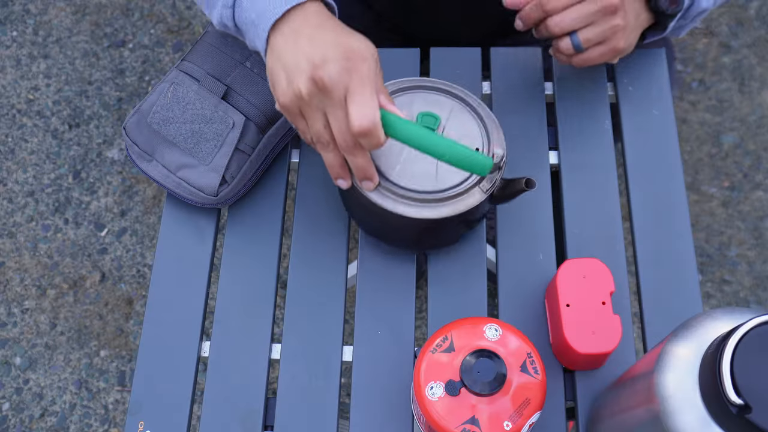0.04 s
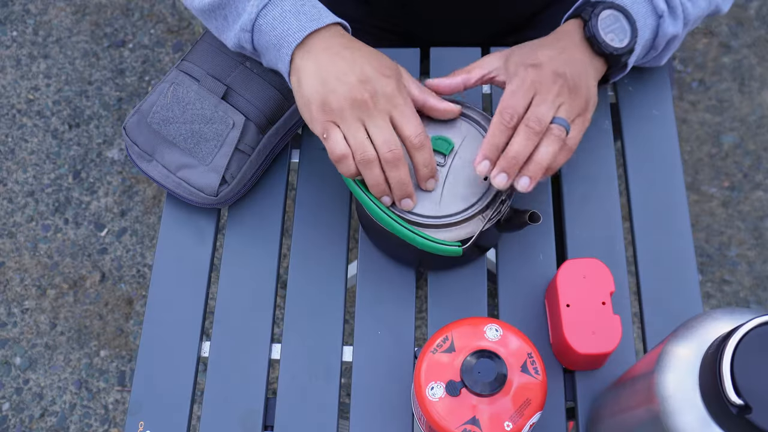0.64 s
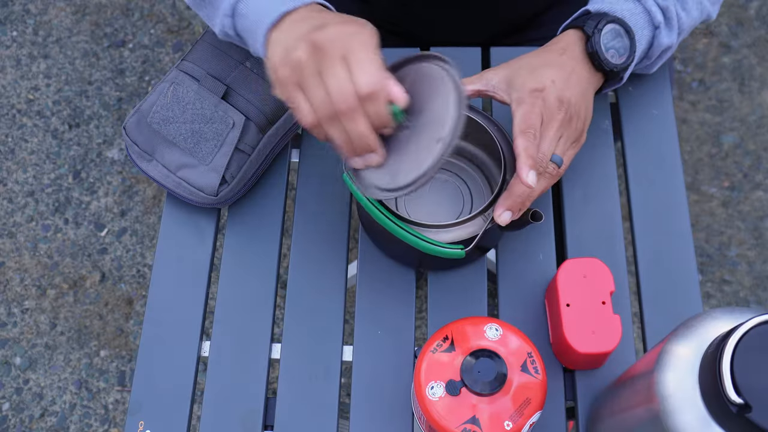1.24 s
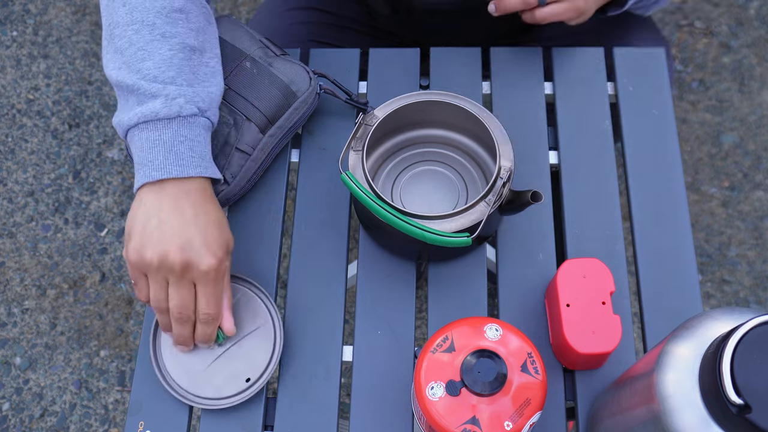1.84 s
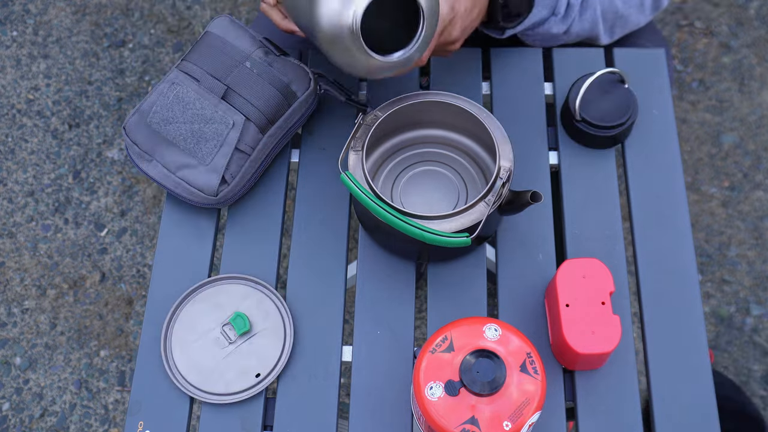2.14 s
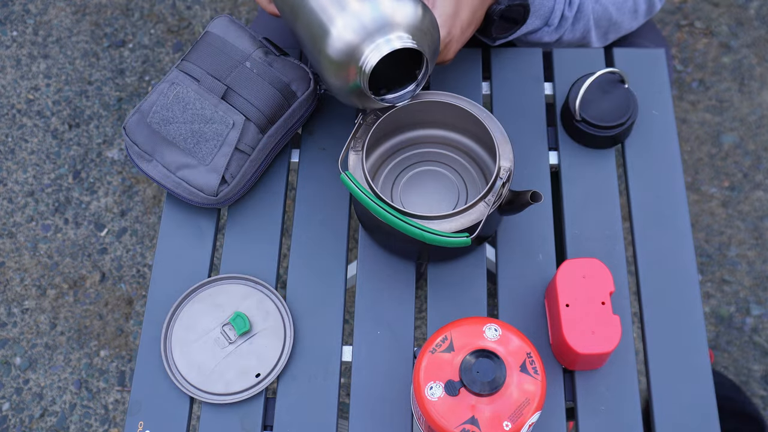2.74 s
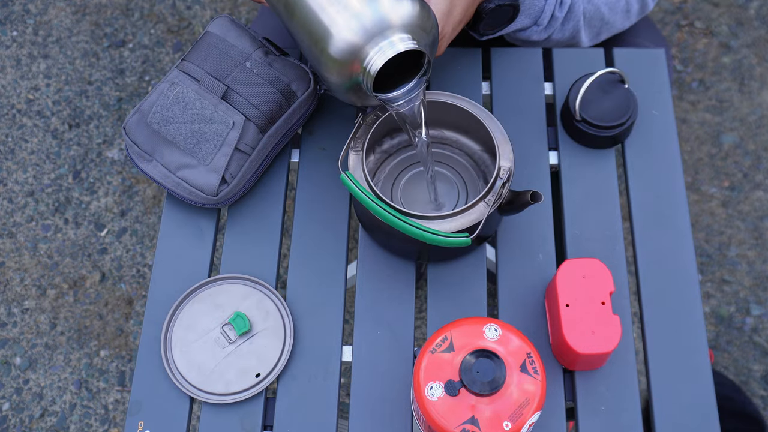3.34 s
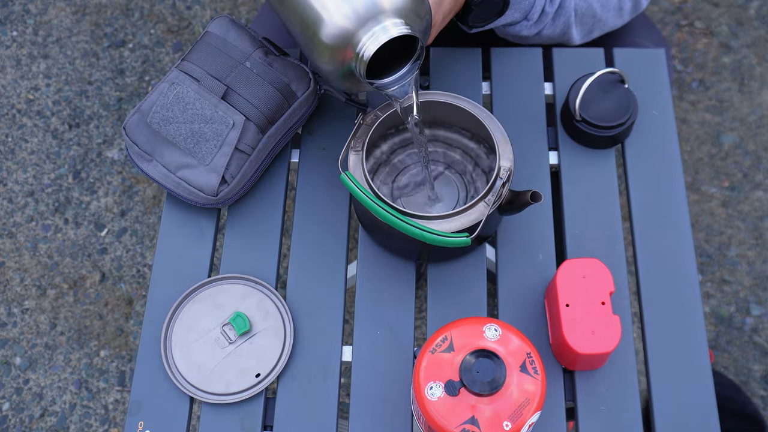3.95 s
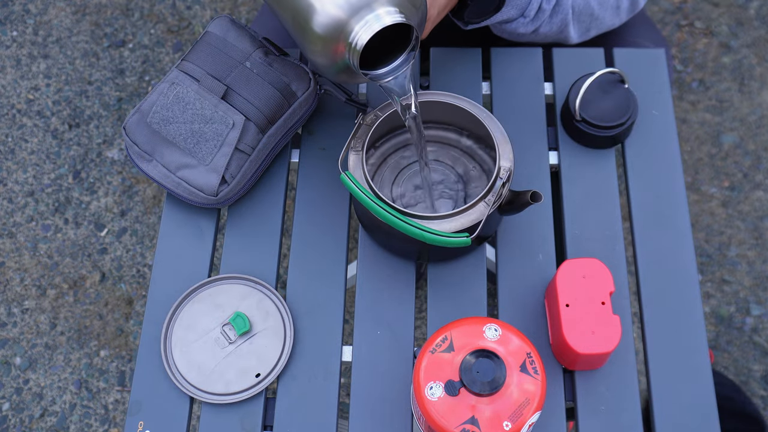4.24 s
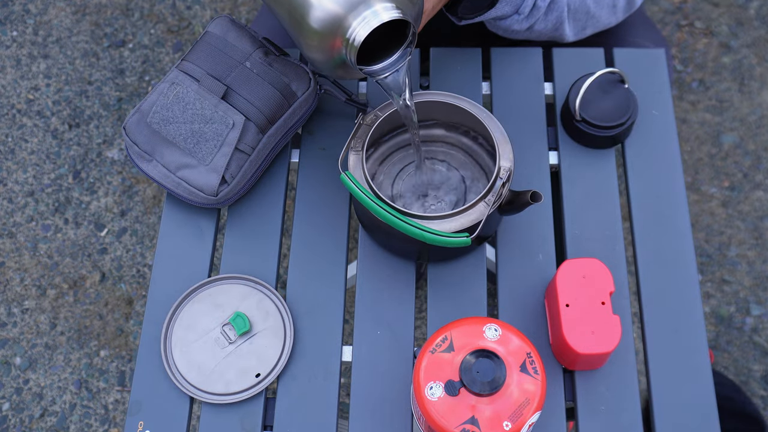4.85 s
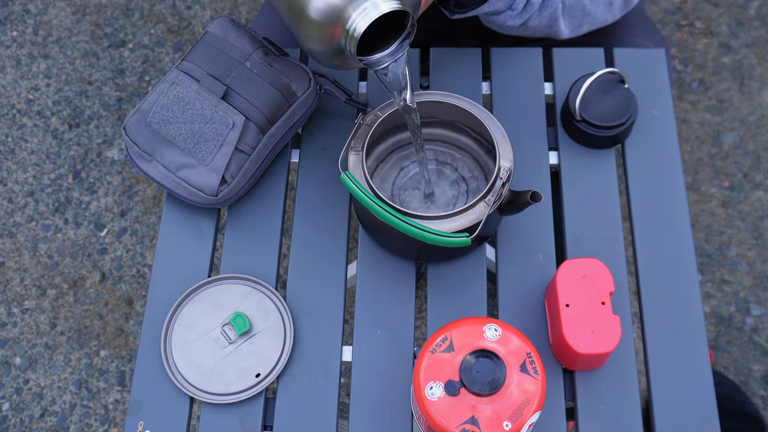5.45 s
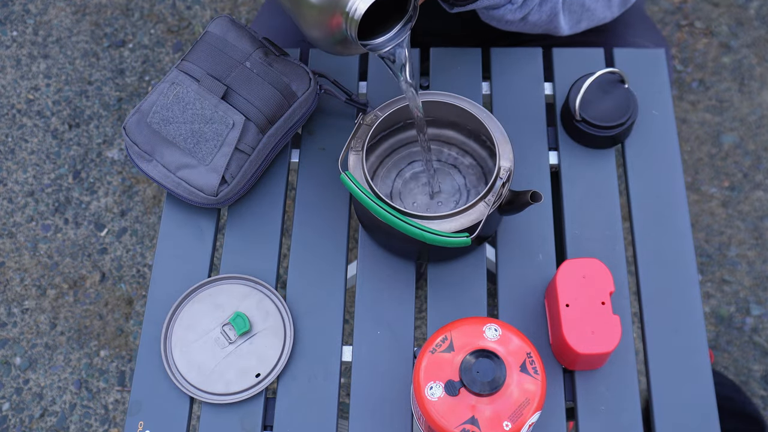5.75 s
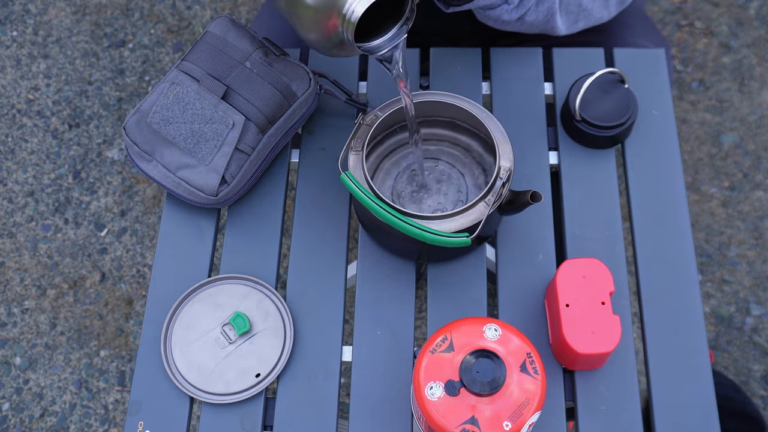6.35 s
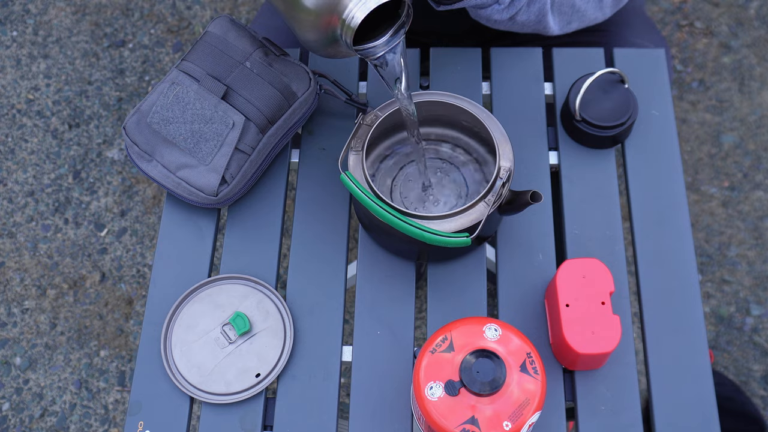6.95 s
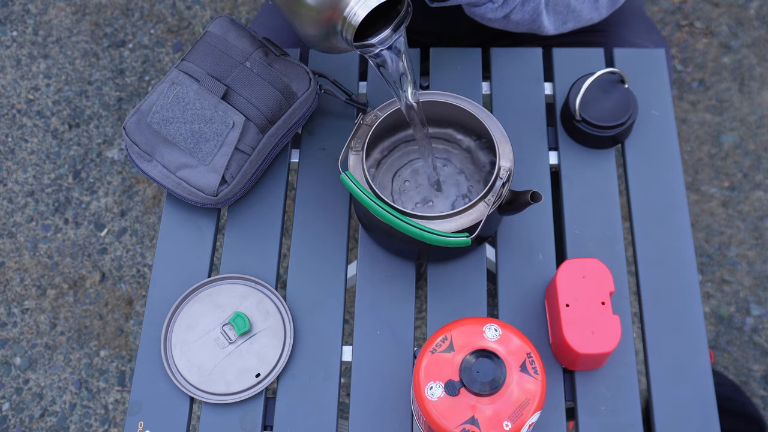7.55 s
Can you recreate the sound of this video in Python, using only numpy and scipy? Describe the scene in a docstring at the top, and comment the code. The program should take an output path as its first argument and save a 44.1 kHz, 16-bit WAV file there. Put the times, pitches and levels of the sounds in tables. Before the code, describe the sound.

Close by, a thin metal camp kettle clatters onto a table. Its handle is folded down with small knocks and rasps, and the lid clinks off and rattles down, ringing briefly. The clatter stops dead. Water drips from a steel bottle, then streams into the kettle, gurgling, fizzing and plinking. Far off in quiet open air, birds whistle long falling notes and later a see-saw song.

```python
"""A thin metal camp kettle clatters onto a slatted table, just below the microphone. Its handle is folded down
and its lid lifted off and laid aside, the metal ringing at each knock and rasping where it is rubbed. At 2.1 s
all the metal sounds break off at once; water from a steel bottle drips, then streams into the kettle, its
bubbles gurgling, fizzing and plinking while the bottom hums. Far off among trees, in quiet open air, birds
whistle long falling notes and a see-saw song."""
import sys
import numpy as np
from scipy import signal
from scipy.fft import rfft, irfft, next_fast_len
from scipy.io import wavfile
from scipy.ndimage import map_coordinates

SR = 44100
rng = np.random.default_rng(int(sys.argv[2]) if len(sys.argv) > 2 else 0)


def persist_wave(psi):
    """Save psi, clipped to +-1, as 16-bit WAV."""
    counts = np.round(np.clip(psi, -1, 1) * 32767).astype(np.int16)
    wavfile.write(sys.argv[1], SR, np.atleast_2d(counts).T)


N = 334719
TOP_HZ = 16000


# The kettle meeting the table, then its handle. Each row: start in seconds, thud, clank and crack in dB.
KETTLE_KNOCKS = [(0.1779, -14, -11.5, -26), (0.1894, -21, -15, -27), (0.213, -24, -14, -39),
                 (0.228, -23, -11.5, -28), (0.2417, -15.5, -19, -22.5), (0.2486, -15, -17.5, -17),
                 (0.462, -63, -33.5, -39.5), (0.572, -44, -24, -62), (0.631, -38, -33, -40),
                 (0.6446, -56, -25.5, -34.5), (0.654, -34, -32.5, -42.5), (0.881, -64, -35, -33),
                 (0.956, -33, -40, -41), (0.983, -31.5, -32.5, -32)]
# Tone of a knock on the empty kettle. Each row: frequency in Hz, relative level in dB.
KETTLE_SPECTRUM = [(80, -33.5), (160, -10.5), (270, -1.5), (430, -3.5), (560, -11), (1150, -2.5),
                   (1800, -6.5), (3200, -10.5), (4000, -16.5), (4600, -15), (6500, -19), (15000, -19.5)]
# The empty kettle's modes. Each row: frequency in Hz, relative level in dB, t60 in seconds.
KETTLE_RING = [(170, -5.5, 0.11), (243.6, -1.5, .17), (426, -2, 0.12), (589, -7, 0.087), (812, -0.5, 0.14),
               (966, 1.5, 0.2), (1145, 2.5, 0.16), (1213, -13, 0.37), (1298, -0.5, 0.22), (1402, 3, 0.094),
               (1964, -12, 0.34), (2000, -23.5, 0.71), (2353, -5.5, 0.21), (2638, -23.5, .7),
               (2720, -15.5, .2), (3210, -9, 0.21), (4500, -6.5, .12)]

def kettle():
    """Close up on the table: each knock clanks and leaves the thin wall ringing."""
    metal = knocks(KETTLE_KNOCKS, KETTLE_SPECTRUM, t60s=(0.064, 0.082, 0.084), gain_db=0)
    metal += ringing([(s, clank_db) for s, _, clank_db, _ in KETTLE_KNOCKS], KETTLE_RING, ring_db=-11.5)
    return metal + amp(-23) * shimmer(metal)


# The lid lifted and laid down. Each row: start in seconds, thud, clank, crack and free ring in dB.
LID_KNOCKS = [(1.081, -69.5, -24.5, -34.5, -52.5), (1.091, -38, -26.5, -19, -37.5),
              (1.138, -40, -27, -18, -55.5), (1.143, -50.5, -21, -18.5, -36.5),
              (1.158, -53, -33.5, -37, -37.5), (1.309, -76, -38, -44.5, -64), (1.976, -30.5, -12, -34, -26),
              (2.031, -37, -18, -52, -40.5), (2.045, -28, -23, -58, -36.5),
              (2.0852, -42.5, -11.5, -26.5, -27), (2.091, -27, -13.5, -45.5, -43),
              (2.101, -48, -18, -37.5, -23.5)]
# Tone of a knock on the lid. Each row: frequency in Hz, relative level in dB.
LID_SPECTRUM = [(120, -42.5), (400, -16.5), (520, -47.5), (750, 1.5), (1080, 9), (1700, 1), (2700, -1),
                (4600, -12.5), (5600, -18), (8500, -28.5), (10000, -35.5), (15500, -30.5)]
# The lid's modes. Each row: frequency in Hz, relative level in dB, t60 in seconds.
LID_RING = [(396, -16.5, 0.44), (1113, -3.5, 0.22), (1297, -4.5, 0.26), (1664, -7, 0.31), (1954, 1, 0.19),
            (2073, 5.5, 0.2), (3060, -6, 0.22), (3530, -10, 0.33), (4360, -2, 0.052), (5740, -13, 0.089),
            (6820, -16, 0.096), (7550, -20, 0.073), (8010, -23, 0.11), (8450, -23.5, 0.14)]

def lid():
    """The lid clinks off the kettle and rattles down beside it, ringing in its own modes."""
    clatter = knocks(LID_KNOCKS, LID_SPECTRUM, t60s=(0.15, 0.056, 0.098), gain_db=-2)
    return clatter + ringing([(s, free_db) for s, *_, free_db in LID_KNOCKS], LID_RING, ring_db=0.5)


def knocks(hits, spectrum, t60s, gain_db):
    """Each contact excites a crowd of short-lived modes; t60s are for thud, clank and crack, in seconds."""
    out, t = np.zeros(N), np.arange(SR // 4) / SR
    bands_hz = [(100, 550), (550, 4000), (4000, TOP_HZ)]
    for s, *levels_db in hits:
        crowd = coloured(rng.standard_normal(len(t)), spectrum)
        knock = sum(unit(band(crowd, lo, hi)) * amp(db - 60 * t / t60)
                    for (lo, hi), db, t60 in zip(bands_hz, levels_db, t60s))
        add(out, s, amp(gain_db) * knock * onset(t, .0003))
    return out


def ringing(blows, modes, ring_db):
    """A few modes ring on after each (seconds, dB) blow, at new strengths every time."""
    out, t = np.zeros(N), np.arange(SR * 3 // 4) / SR
    for s, blow_db in blows:
        ring = 0
        for hz, db, t60 in modes:
            decay = amp(db + rng.normal(0, 1) - 60 * t / t60)
            ring += decay * np.sin(2 * np.pi * (hz * t + rng.random()))
        add(out, s, amp(blow_db + ring_db) * ring * onset(t, 0.00061))
    return out


def shimmer(x, t60=0.57):
    """Many faint partials of the thin wall ring on after a blow."""
    t = np.arange(SR * 3 // 4) / SR
    return convolved(x, band(rng.standard_normal(len(t)), 1500, 9000) * amp(-60 * t / t60))


# Strokes over the metal. Each row: start and length in seconds, final rub, final hiss and swell in dB.
RUB_STROKES = [(.25, 0.11, -53.5, -67, -11), (0.478, 0.097, -26.5, -48, 17), (0.606, 0.028, -29, -49, 27),
               (0.793, 0.12, -47, -48.5, 4.5), (0.963, 0.074, -45, -60, -10),
               (1.075, 0.072, -34.5, -32.5, 7), (1.281, 0.016, -46.5, -49, 2), (1.351, 0.11, -28, -61, 13),
               (1.59, 0.084, -57.5, -82, 7)]
# Tone of the rubbing. Each row: frequency in Hz, relative level in dB.
RUB_SPECTRUM = [(100, -29.5), (280, -11.5), (420, -12), (720, 1.5), (1250, 5), (2000, -7.5), (3500, -6.5),
                (6000, -17), (15000, -27)]
# Resonances of the rubbed metal. Each row: centre and width in Hz, strength in dB.
SHELL_PEAKS = [(440, 42, 18.5), (570, 130, 11.5), (627, 130, 4.5), (1108, 50, 0.5), (1320, 38, 6),
               (1510, 240, 9.5), (2260, 70, 15), (2700, 71, -5.5), (3320, 81, -8), (4880, 130, 7)]

def rubbing(slips_per_s=700, grit_db=-1):
    """Tiny slips of handle, fingers and lid excite the thin metal."""
    rub_gain, hiss_gain = sum(np.outer(amp([rub_db, hiss_db]), stroke(s, length, swell_db))
                              for s, length, rub_db, hiss_db, swell_db in RUB_STROKES)
    slips = unit((rng.random(N) < slips_per_s / SR) * rng.standard_normal(N))
    force = rng.standard_normal(N) + amp(grit_db) * slips
    scrape = resonant(coloured(in_kettle(force, echo_db=3.5), RUB_SPECTRUM), SHELL_PEAKS)
    hiss = band(in_kettle(force, echo_db=-6.5), 3900, 13000)
    return rub_gain * unit(scrape) + hiss_gain * unit(hiss)


def stroke(s, length, swell_db, attack_s=0.0075, release_db_per_s=333):
    """A stroke takes hold, swells or eases to its final strength and lets go."""
    t = np.arange(N) / SR - s
    db = swell_db * (np.clip(t / length, 0, 1) - 1) - release_db_per_s * np.maximum(t - length, 0)
    return np.clip(t / attack_s, 0, 1) * amp(db)


# Dull taps on the metal. Each row: start in seconds, level in dB, pitch in Hz, t60 in seconds.
SOFT_TAPS = [(.288, -26, 273, 0.085), (.463, -29.5, 828, 0.093), (.881, -20, 660, 0.047),
             (.957, -17.5, 626, 0.031), (0.986, -17, 1410, 0.029), (1.075, -26, 673, 0.045),
             (1.235, -39, 400, 0.11), (1.351, -37, 396, 0.4), (2.28, -58, 388, 0.88),
             (2.69, -51, 382, 0.12), (2.971, -30.5, 396, 0.11), (2.974, -19.5, 590, 0.021)]

def taps():
    """Each soft contact of hands or bottle wakes a single low mode."""
    out, t = np.zeros(N), np.arange(SR // 4) / SR
    for s, db, hz, t60 in SOFT_TAPS:
        add(out, s, amp(db - 60 * t / t60) * np.sin(2 * np.pi * hz * t) * onset(t, 0.0012))
    return out


# The pour, heard from above the kettle. Each row: time in seconds, gurgle and fizz in dB.
POUR_LEVELS = [(3.45, -63, -49), (3.55, -60.8, -54), (3.76, -45, -45), (3.9, -62.5, -58.5),
               (4.03, -56.5, -56), (4.16, -61, -53.5), (4.3, -50.5, -52.5), (4.42, -46, -44),
               (4.62, -43.5, -41), (5.0, -46, -47.6), (5.08, -55, -48), (5.19, -54.5, -57),
               (5.3, -48, -49.5), (5.63, -45.5, -48), (5.7, -61, -71), (5.83, -59.3, -66), (5.91, -39, -44),
               (6.2, -42.5, -41.5), (6.45, -41.5, -44.5), (6.62, -49, -49), (6.72, -42.5, -53.5),
               (6.88, -49, -53.5), (7.15, -55, -63), (7.24, -46, -57.5), (7.59, -48.5, -50)]

def stream(surges_per_s=15, surge_db=1.27):
    """Water wavers as it leaves the bottle and drives large and tiny bubbles into the kettle."""
    gurgle_db, fizz_db = curves(POUR_LEVELS) + surge_db * wobble(surges_per_s)
    blobs = spurts(per_s=160, spread_db=2.5, t60=.07)
    flowing = np.clip((np.arange(N) / SR - POUR_LEVELS[0][0]) / .1, 0, 1)
    return flowing * (amp(gurgle_db) * gurgle(blobs) + amp(fizz_db) * fizz(blobs))


# Tone of the large bubbles. Each row: frequency in Hz, relative level in dB.
GURGLE_SPECTRUM = [(400, -3), (900, -15.5), (1500, -4.5), (2500, 4.5), (3800, 9.5), (5200, 7.5),
                   (7000, 13.5)]
# Resonances of the open kettle. Each row: centre and width in Hz, strength in dB.
HOLLOW_PEAKS = [(919, 36, 12.5), (1147, 52, 6.5), (1410, 140, 2), (1660, 160, -5.5), (2330, 79, 3.5),
                (3280, 540, -2), (3940, 47, 2.5), (5110, 320, 3.5)]

def gurgle(blobs, wash_db=-15):
    """Large bubbles and a soft wash of noise resound in the kettle's hollow."""
    swarm = bubbles(blobs, count=6500, lo_hz=900, hi_hz=5600, cycles=28, spread_db=4.6)
    water = unit(in_kettle(swarm, echo_db=0))
    water += amp(wash_db) * unit(band(rng.standard_normal(N), 600, 5340))
    water = resonant(band(coloured(water, GURGLE_SPECTRUM), 650, TOP_HZ), HOLLOW_PEAKS)
    return water / np.std(band(water, 900, 2900))  # the midrange sets the level


# Tone of the tiny bubbles. Each row: frequency in Hz, relative level in dB.
FIZZ_SPECTRUM = [(4000, 2), (5500, -18), (7000, -6), (10500, -3.5), (13000, -3), (16000, -14)]

def fizz(blobs, wash_db=-15):
    """Tiny bubbles ring high and echo briefly in the kettle, over a soft hiss."""
    swarm = bubbles(blobs, count=3800, lo_hz=5500, hi_hz=16000, cycles=30, spread_db=5.5)
    water = unit(in_kettle(swarm, echo_db=-1, t60=.045))
    return unit(coloured(water + amp(wash_db) * rng.standard_normal(N), FIZZ_SPECTRUM))


def spurts(per_s, spread_db, t60):
    """Blobs in the stream land at random: each starts a burst of bubbling that dies away."""
    landings = (rng.random(N) < per_s / SR) * amp(spread_db * np.clip(rng.standard_normal(N), -2, 1.5))
    fade = amp(-60 * np.arange(SR // 4) / SR / t60)
    energy = signal.fftconvolve(landings ** 2, fade ** 2)[:N]
    return unit(np.sqrt(np.abs(energy)))


def bubbles(blobs, count, lo_hz, hi_hz, cycles, spread_db):
    """A swarm of bubbles of random size, born most densely where a blob has just landed."""
    when, pitch, life, loud = rng.random((count, 4)).T[..., None]
    hz = lo_hz * (hi_hz / lo_hz) ** pitch
    t = np.arange(SR // 40) / SR
    gain = amp(spread_db * np.minimum(-np.log(1 - loud), 3))
    grains = gain * bubble(t, hz, t60=cycles * (.5 + life) / hz, rise=0.088, attack_s=.0002)
    births = np.cumsum(blobs ** 2)
    at = np.searchsorted(births, when * births[-1]) + np.arange(len(t))
    return np.bincount(at.ravel(), grains.ravel(), N)[:N]


def bubble(t, hz, t60, rise, attack_s):
    """A trapped bubble rings, its pitch rising as it nears the surface."""
    phase = 2 * np.pi * hz * t * (1 + rise * np.minimum(t / t60, 1))
    return np.sin(phase) * amp(-60 * t / t60) * onset(t, attack_s)


# The loudest single bubbles. Each row: start in seconds, level in dB, pitch in Hz, t60 in seconds.
DROP_PLINKS = [(3.057, -35.5, 9200, 0.0094), (3.22, -28.5, 7976, 0.018), (3.351, -21.5, 10650, 0.025),
               (3.363, -22.5, 9100, 0.015), (3.434, -30.5, 8500, .015), (3.536, -26, 2570, 0.074),
               (3.559, -30, 2900, 0.039), (3.659, -21, 3670, 0.036), (4.051, -22.5, 5810, 0.05),
               (4.275, -31, 2340, 0.059), (4.42, -21.5, 4020, 0.027), (4.634, -20.5, 3510, 0.04),
               (4.839, -23, 2190, 0.019), (5.212, -25.5, 10040, 0.017), (5.884, -17, 4830, .012),
               (6.103, -15.5, 4630, 0.016), (6.206, -17, 7040, 0.015), (6.292, -21.5, 2320, 0.053),
               (7.353, -11, 3286, 0.027), (7.534, -19, 3250, 0.018), (7.545, -28.5, 1343, 0.066)]

def drops(tick_db=-14, tick_t60=0.052):
    """Single drops tick and leave a loud bubble."""
    out, t = np.zeros(N), np.arange(SR // 8) / SR
    for s, db, hz, t60 in DROP_PLINKS + stray_plinks(count=10):
        tick = unit(band(rng.standard_normal(len(t)), hz * 0.9, hz * 1.33))
        tick *= amp(tick_db - 60 * t / tick_t60)
        plink = bubble(t, hz, t60, rise=0.063, attack_s=0.001)
        add(out, s, amp(db) * onset(t, .0006) * (plink + tick))
    return in_kettle(out, echo_db=-11)


def stray_plinks(count, from_s=3.58, to_s=5.4, lo_hz=1580, hi_hz=8970, db=-30.5, spread_db=2.5, cycles=136):
    """Lesser bubbles come at random while the water is still shallow; rows as in DROP_PLINKS."""
    when, pitch, faint = rng.random((count, 3)).T
    starts = from_s + (to_s - from_s) * (np.arange(count) + when) / count
    hz = lo_hz * (hi_hz / lo_hz) ** pitch
    return list(zip(starts, db - spread_db * (2 * faint - 1), hz, cycles / hz))


# The rim's touch, first drops and gulps. Each row: start in seconds, thud, clank and crack in dB.
SLAP_KNOCKS = [(2.445, -67.5, -50, -83), (2.973, -44, -40, -46), (3.22, -75.5, -66, -33),
               (3.351, -68.5, -71, -40.5), (6.174, -54, -22.5, -28), (6.2231, -50, -23.5, -27),
               (6.258, -31.5, -28, -59), (6.29, -51, -19, -26.5)]
# Tone of a slap on the filling kettle. Each row: frequency in Hz, relative level in dB.
FILLED_SPECTRUM = [(150, -40), (300, -30), (400, -9.5), (650, 0), (1150, 5.5), (1800, -8), (3000, -12),
                   (6000, -2), (11000, 10), (15000, -2)]
# The filling kettle's modes. Each row: frequency in Hz, relative level in dB, t60 in seconds.
FILLED_RING = [(575, 5, 0.064), (760, 6, 0.14), (1042, 13, 0.27), (1140, 15, 0.17), (1620, 5, 0.23)]

def slaps():
    """A touch on the rim, the first drops and heavier gulps knock the kettle and ring it faintly."""
    blows = [(s, max(thud_db, clank_db)) for s, thud_db, clank_db, _ in SLAP_KNOCKS]
    contacts = knocks(SLAP_KNOCKS, FILLED_SPECTRUM, t60s=(0.11, 0.075, 0.035), gain_db=-1)
    return contacts + ringing(blows, FILLED_RING, ring_db=-25)


# How hard the stream drums on the bottom. Each row: time in seconds, relative level in dB.
DRUM_LEVELS = [(4.1, -78), (4.21, -56.5), (5.01, -46), (5.07, -67), (5.48, -58.5), (5.81, -81),
               (5.98, -48.5), (6.1, -54), (6.27, -38.5), (6.39, -57.5), (7.01, -77), (7.59, -68)]

def bottom_hum(covered_s=4.05, dry_hz=797, loaded_hz=537, sink_s=1.2, gain_db=-3, patter_db=3):
    """The stream drums on the bottom, whose two lowest notes sink under the water's weight."""
    drum_db, = curves(DRUM_LEVELS)
    wet_s = np.maximum(np.arange(N) / SR - covered_s, 0)
    base_hz = loaded_hz + (dry_hz - loaded_hz) * np.exp(-wet_s / sink_s)
    phase = 2 * np.pi * np.cumsum(base_hz) / SR
    level = np.minimum(wet_s / .1, 1) * amp(drum_db + gain_db + patter_db * wobble(40))
    hum = 0
    for ratio, db in [(0.97, 0), (1.46, -7)]:  # each note is a multiple of the base pitch
        drive = wobble(95) + 1j * wobble(95)  # random strength and phase
        hum += amp(db) * unit(np.real(drive * np.exp(1j * ratio * phase)))
    return level * hum


def in_kettle(x, echo_db, t60=0.092):
    """Sound bounces between the kettle's walls for a moment."""
    t = np.arange(SR // 10) / SR
    return x + amp(echo_db) * convolved(x, rng.standard_normal(len(t)) * amp(-60 * t / t60))


# Long whistles from the trees. Each row: start in seconds, time stretch, level in dB.
WHOLE_WHISTLES = [(1.065, 0.9, -42.5), (2.499, 1.0, -39), (3.46, 0.98, -39)]
# A whistle's end heard alone. Each row: start of the whole in seconds, time stretch, level in dB.
LONE_ENDINGS = [(1.51, 1, -40.5)]
# A whistle's two parts, with a break between, before stretching.
# Each row: offset, rise time and fall time in seconds, then peak level, rise and fall in dB.
WHISTLE_SWELLS = [(-.008, 0.31, .16, -0.5, 11, 8.5), (.515, .02, 0.36, -5, 0, 21.5)]

def whistles():
    """A distant bird whistles long falling notes; of one, only the end is heard."""
    out, lead_s = np.zeros(N), WHISTLE_SWELLS[0][0]
    for calls, parts in [(WHOLE_WHISTLES, WHISTLE_SWELLS), (LONE_ENDINGS, WHISTLE_SWELLS[1:])]:
        for s, stretch, db in calls:
            t = np.arange(SR) / SR / stretch + lead_s
            add(out, s + lead_s, amp(db) * whistle(t, parts))
    return out


def whistle(t, parts, top_hz=5670, toward_hz=723, glide_s=.45, waver=0.0064, flutter_db=5, edge_s=.012):
    """A nearly pure tone glides down, wavering and fluttering; each part swells and fades."""
    flick_hz = 1998 * np.exp((t[0] - t) / .005)  # it opens with a quick flick from above
    hz = toward_hz + (top_hz - toward_hz) * np.exp(-t / glide_s) + flick_hz
    phase = 2 * np.pi * np.cumsum(hz * (1 + waver * wobble(70, len(t)))) / SR
    tone = np.sin(phase) + amp(-31) * np.sin(3 * phase)
    level = 0
    for start, rise, fall, db, rise_db, fall_db in parts:
        end = start + rise + fall
        edges = np.clip(np.minimum(t - start, end - t) / edge_s, 0, 1)
        level += edges * amp(db - np.interp(t, [start, start + rise, end], [rise_db, 0, fall_db]))
    return level * amp(flutter_db * wobble(53.65, len(t))) * tone


# Phrases of the far see-saw song. Each row: start of the sweep in seconds, held pitch in Hz, level in dB.
SONG_PHRASES = [(5.803, 6060, -44), (6.11, 6000, -45.5), (6.42, 5900, -37.5), (6.682, 5410, -36),
                (6.964, 5240, -33), (7.225, 4880, -35), (7.487, 4450, -37.5)]

def seesaw_song(climb=0.076, low_ratio=.8, sweep_hz=(5900, 4700, 3735)):
    """Each phrase is a held note, a downward sweep and a lower note; the song sinks and grows louder."""
    out = np.zeros(N)
    for s, hz, db in SONG_PHRASES:
        add(out, s - .062, amp(db) * chirp(0.0535, [hz * (1 - climb), hz, hz], rasp=0.012))
        add(out, s, amp(db) * chirp(0.073, sweep_hz))
        add(out, s + .098, amp(db - 1.5) * chirp(0.031, [hz * low_ratio] * 3, rasp=0.014))
    return out


# Far chirps. Each row: start and length in seconds, first, middle and last pitch in Hz, level in dB.
LONE_CHIRPS = [(0.313, 0.027, 6760, 5680, 4670, -43.5), (1.913, 0.045, 3050, 3380, 3050, -54),
               (2.289, 0.037, 6300, 6470, 6500, -55.5), (2.721, 0.027, 6900, 5800, 3900, -40)]

def chirps():
    """A few single bird notes come from the trees."""
    out = np.zeros(N)
    for s, length_s, *pitches_hz, db in LONE_CHIRPS:
        add(out, s, amp(db) * chirp(length_s, pitches_hz))
    return out


def chirp(length_s, pitches_hz, rasp=0.018):
    """A short note swells and fades as it bends through three pitches, roughened by fast jitter."""
    u = np.linspace(0, 1, int(length_s * SR))
    bend_hz = np.polyval(np.polyfit([0, .5, 1], pitches_hz, 2), u)
    hz = bend_hz * (1 + rasp * wobble(496, len(u)))
    return np.abs(np.sin(np.pi * u)) ** 0.36 * np.sin(2 * np.pi * np.cumsum(hz) / SR)


# How long sound lingers among the trees. Each row: frequency in Hz, t60 in seconds.
TREE_DECAY = [(200, .2), (3000, 0.3), (6500, 0.1), (12000, 0.85)]

def tree_scatter(x):
    """Trees and ground scatter a faint tail."""
    hz, t, spectra = signal.stft(rng.standard_normal(SR * 3 // 4), SR, nperseg=256)
    decay = amp(-60 * t / along(TREE_DECAY, hz)[:, None])
    _, tail = signal.istft(spectra * decay, SR, nperseg=256)
    return convolved(x, tail)


# The open air around the table. Each row: frequency in Hz, relative level in dB.
AIR_SPECTRUM = [(12, -44), (20, -14.5), (107, 3.5), (138, 0), (319, -14), (377, -10), (802, -18),
                (1260, -16.5), (1660, -8), (2200, -9.5), (2670, -4.5), (6180, -22.5), (14700, -29),
                (16000, -16)]

def air(db=-57):
    """A far rumble and a soft rustle of foliage."""
    return amp(db + 0.84 * wobble(5.0)) * unit(coloured(rng.standard_normal(N), AIR_SPECTRUM))


def amp(db):
    """Decibels to gain."""
    return 10 ** (np.asarray(db) / 20)


def unit(x):
    """Scale to rms 1."""
    return x / np.sqrt(np.mean(x ** 2) + 1e-20)


def onset(t, attack_s):
    """A soft rise from 0 to 1."""
    return 1 - np.exp(-t / attack_s)


def along(points, hz):
    """Interpolate (Hz, value) points on a log axis."""
    knots_hz, values = np.transpose(points)
    return np.interp(np.log(hz + 1), np.log(knots_hz + 1), values)


def curves(rows):
    """One value per sample for each column after the time."""
    s, *columns = np.transpose(rows)
    return [np.interp(np.arange(N) / SR, s, column) for column in columns]


def wobble(rate, size=N):
    """A smooth random curve, rate knots a second."""
    return map_coordinates(rng.standard_normal(int(size * rate / SR) + 4), [np.arange(size) * rate / SR])


def filtered(x, response):
    """x times a response of frequency."""
    size = next_fast_len(len(x) + 8192)
    return irfft(rfft(x, size) * response(np.fft.rfftfreq(size, 1 / SR)), size)[:len(x)]


def coloured(x, spectrum):
    """x through a (Hz, dB) spectrum."""
    return filtered(x, lambda hz: amp(along(spectrum, hz)))


def band(x, lo, hi):
    """The part of x between two soft edges in Hz."""
    return filtered(x, lambda hz: (1 + (lo / (hz + 1)) ** 8) ** -.5 * (1 + (hz / hi) ** 8) ** -.5)


def resonant(x, peaks):
    """x plus its ringing in (Hz, width, dB) resonances."""
    return filtered(x, lambda hz: 1 + sum(
        amp(db) * 1j * hz * width / (centre ** 2 - hz ** 2 + 1j * hz * width)
        for centre, width, db in peaks))


def convolved(x, tail):
    """x spread over a tail of unit energy."""
    return signal.fftconvolve(x, tail / np.linalg.norm(tail))[:N]


def add(track, s, sound):
    """Mix a sound into the track at time s."""
    at = max(round(s * SR), 0)
    track[at:at + len(sound)] += sound[:max(len(track) - at, 0)]


def scene(clatter_stop_s=2.111):
    """Everything at one microphone above the table; the birds are far, among trees."""
    birds = whistles() + seesaw_song() + chirps()
    water = stream() + bottom_hum() + drops() + slaps()
    dead_stop = np.clip((clatter_stop_s - np.arange(N) / SR) / .001, 0, 1)
    clatter = band(kettle() + lid() + rubbing(), 110, SR) * dead_stop
    return (clatter + taps() + water + amp(-1) * birds + amp(-3) * tree_scatter(birds) + air())[None]


def record(dry):
    """The microphone's chain rolls off steeply at TOP_HZ."""
    return np.array([filtered(x, lambda hz: np.clip((TOP_HZ - hz) / 200 + .5, 0, 1)) for x in dry])


dry = scene()
out = record(dry)
persist_wave(out)
```